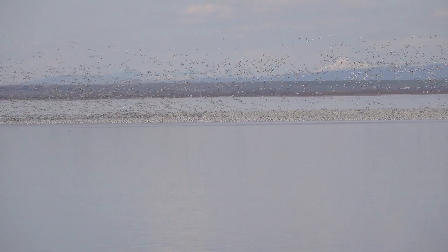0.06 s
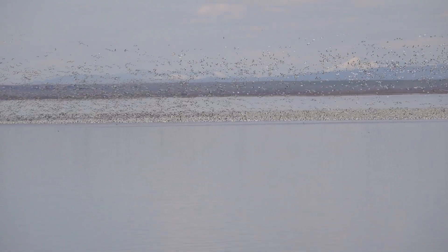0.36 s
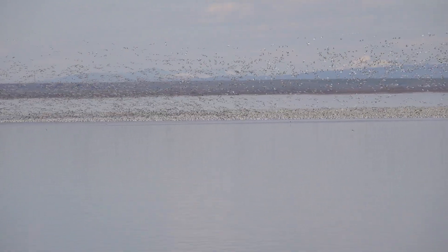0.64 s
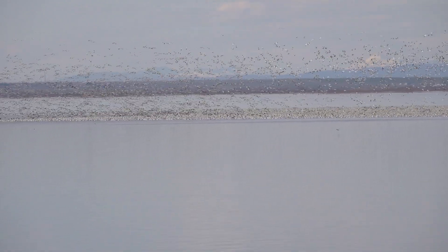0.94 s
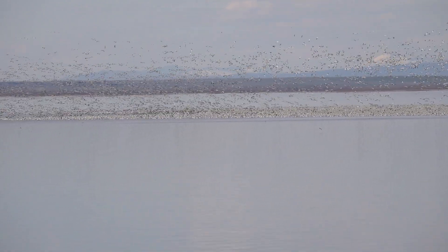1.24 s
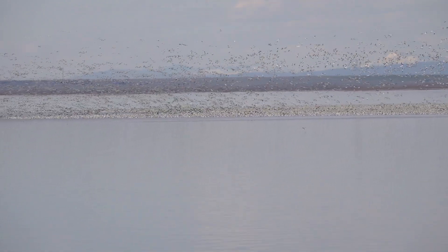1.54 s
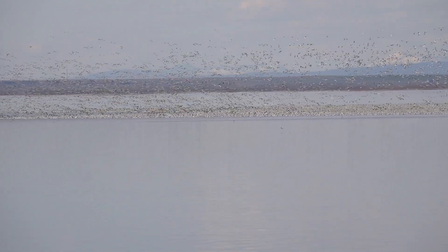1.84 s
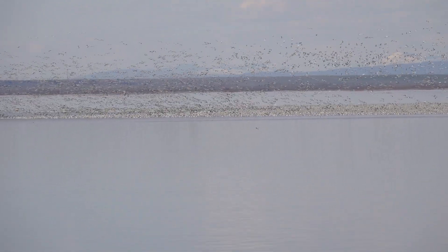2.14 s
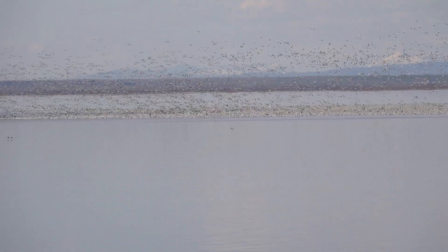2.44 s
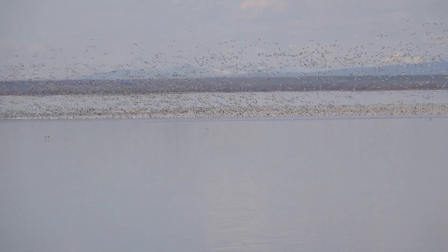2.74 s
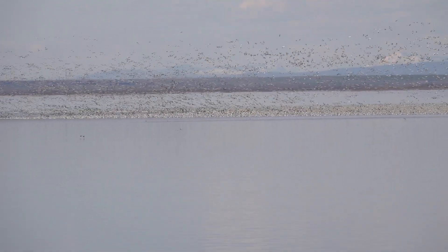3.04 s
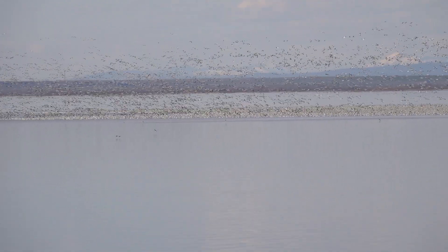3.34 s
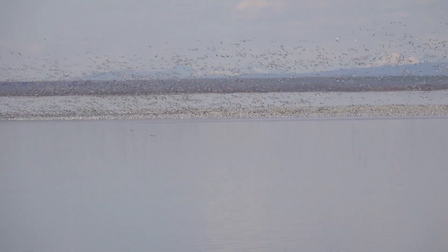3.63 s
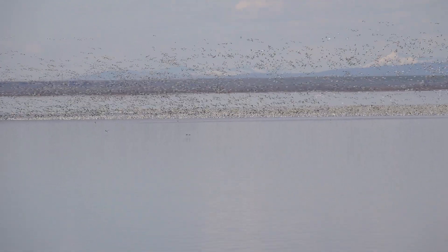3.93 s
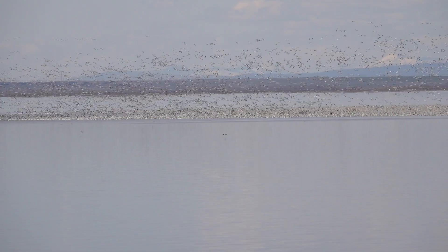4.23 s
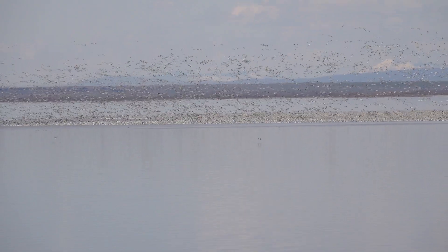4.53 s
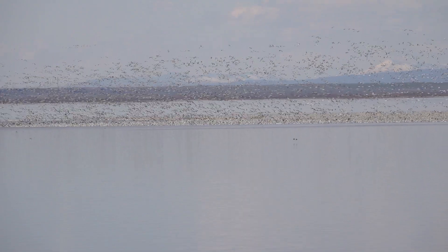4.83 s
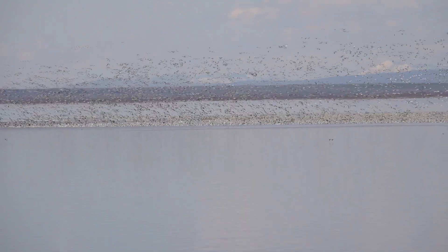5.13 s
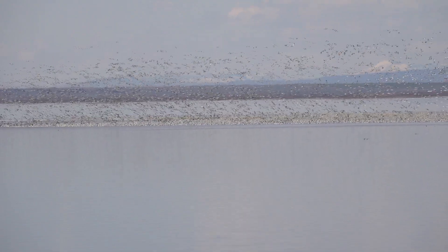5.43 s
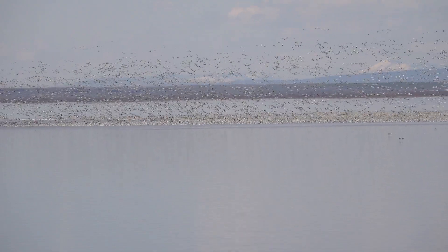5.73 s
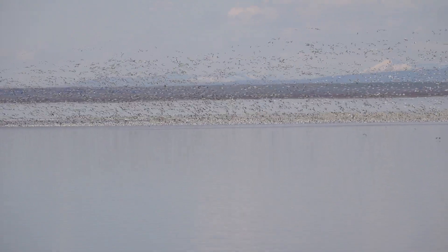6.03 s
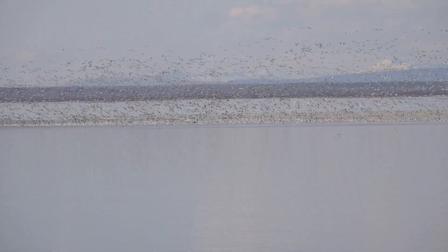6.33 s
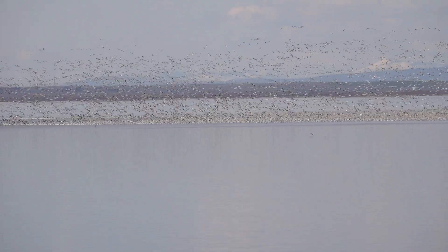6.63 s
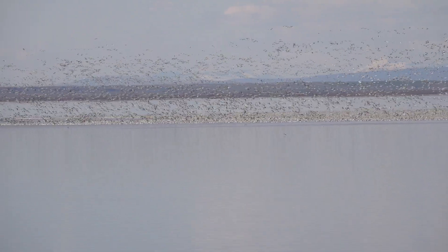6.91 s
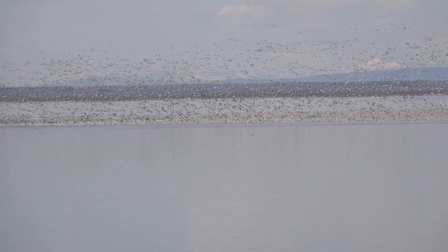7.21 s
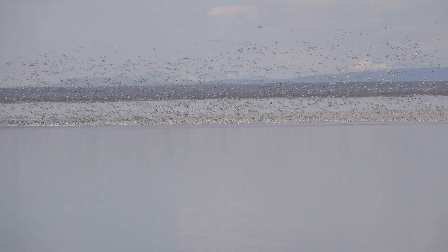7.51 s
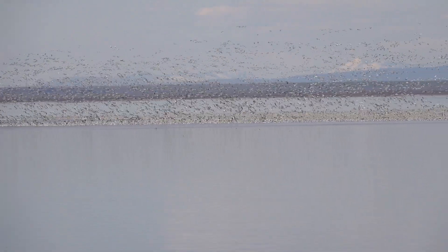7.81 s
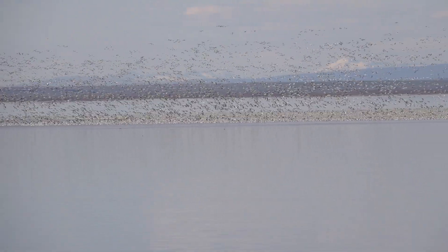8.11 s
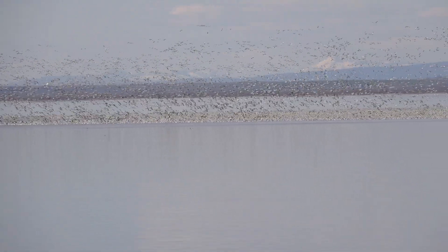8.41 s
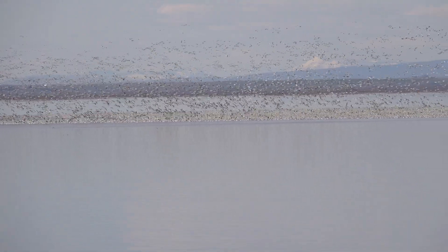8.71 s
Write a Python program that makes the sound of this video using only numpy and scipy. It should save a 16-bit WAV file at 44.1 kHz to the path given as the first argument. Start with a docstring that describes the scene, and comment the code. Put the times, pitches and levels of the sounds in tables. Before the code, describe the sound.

A huge flock of geese gabbles far off across still water, its yelps blurred together over a low hum of distant traffic. A few small ticks sound near the microphone and some faint single honks follow. Then a long vehicle approaches from the right, passes close with roaring tyres and a falling engine note, and leaves to the left, trailing a bright hiss.

```python
"""A huge flock of geese gabbles far off across still water, thousands of yelps blurred into one bed.
Low hums come and go, a few small ticks sound close by and some nearer geese honk. Then a long road
vehicle comes up from the right, passes close and leaves to the left: its engine note drops with the
Doppler shift, its tyres drone, roar and howl, and a bright hiss like road spray trails behind it."""
import sys
import numpy as np
from scipy import signal
from scipy.fft import rfft, irfft, next_fast_len
from scipy.io import wavfile
from scipy.ndimage import uniform_filter1d, map_coordinates

SR = 44100
rng = np.random.default_rng(int(sys.argv[2]) if len(sys.argv) > 2 else 0)


def store_wav(level_fs):
    """Save 16-bit WAV to argv[1]."""
    pcm = np.round(np.clip(np.atleast_2d(level_fs), -1, 1) * 32767)
    wavfile.write(sys.argv[1], SR, pcm.T.astype(np.int16))


N = 395136
TIME = np.arange(N) / SR
WINDOW = dict(nperseg=1024, noverlap=768)
HZ, FRAMES, _ = signal.stft(np.zeros(N), SR, **WINDOW)  # f/Hz and t/s grid of the moving filters
HZ = HZ[:, None] + 1

# Tone colour of the far flock and the beds under it: f/Hz, relative level/dB
FLOCK_EQ = [(240, -39), (400, -11), (500, -3.5), (640, -3.5), (700, -2.5), (775, -3.5), (850, 1.5),
            (915, 0.5), (1000, -10), (1100, -11.5), (1290, -5), (1830, -13.5), (2000, -26), (2200, -43.5),
            (4000, -110)]
TRAFFIC_EQ = [(20, -23), (45, -5), (80, -13.5), (105, -0.5), (125, 0.5), (155, -3), (200, -4), (280, -20.5),
              (400, -18.5), (800, -18.5), (1500, -35.5), (2500, -44.5), (6000, -68)]
AIR_RUMBLE_EQ = [(15, -22), (28, -17.5), (45, 3.5), (65, 2.5), (95, 2.5), (140, -17), (300, -45),
                 (900, -120)]
MIC_HISS_EQ = [(20, 0), (2000, -8.5), (3500, -2), (6000, -3.5), (10000, -6.5), (15500, -10)]
# Low hums: peak t/s, half length/s, f/Hz, glide/(Hz/s), level/dB
LOW_HUMS = [(0.399, 0.64, 104.6, 2.1, -52), (1.526, 0.14, 103.5, 1.3, -48), (3.012, 1.9, 101.9, -1.28, -52),
            (3.304, 3.6, 158.1, 0.56, -55.5), (3.606, 0.89, 500.6, 1.5, -64),
            (4.697, 1.54, 83.4, 1.8, -47.5), (7.62, 0.16, 151.7, -1.8, -35), (8.4, 0.24, 152.5, -4, -49),
            (8.751, .3, 87.5, -1.38, -41)]
# Small contacts: t/s, level/dB, ring f/Hz, 60 dB decay/s, low-pass f/Hz, knock f/Hz, left-right/dB
CLOSE_TICKS = [(0.24, -42, 1810, 0.024, 2400, 1762, -6), (1.0275, -32, 8300, 0.01, 13940, 1304, 6.5),
               (1.14, -33, 6450, 0.014, 7100, 1500, -4), (2.17, -55, 7000, 0.013, 12000, 2090, -5),
               (5.101, -57, 5400, .012, 9000, 2290, 1), (7.5738, -40.5, 8700, .01, 12700, 1500, 8)]
# Nearer geese: t/s, fundamental level/dB, f/Hz, glide each way/share of pitch
NEAR_HONKS = [(1.76, -75, 970, .08), (1.98, -63, 800, 0.022), (2.71, -63, 760, -.03),
              (3.229, -63, 794, -0.065), (4.18, -59, 790, -0.038)]
# Tone colour of the tyre layers before Doppler shift: f/Hz, relative level/dB
CASING_EQ = [(40, -24), (90, -0.5), (140, -6.5), (210, -1.5), (255, 0), (295, -7), (325, -6.5), (450, -36),
             (1500, -78), (4000, -120)]
TREAD_EQ = [(150, -37.5), (330, -8), (450, 0.5), (620, 0), (850, 0), (1100, -3.5), (1500, -11.5),
            (1900, -37), (3000, -37), (8000, -94)]
PUMPING_EQ = [(900, -24), (1500, -1.5), (1800, -1), (2050, -1.5), (2400, -5.5), (2750, -13.5), (3500, -26),
              (5000, -26), (12000, -84)]
WHEEL_HISS_EQ = [(1500, -29), (2600, 0), (3300, 0.5), (4500, -7), (6000, -15.5), (8000, -21.5),
                 (10000, -24.5), (12000, -36), (16000, -47)]
# Fader moves of the tyres' upper bands: t/s, groove howl level/dB, air pumping level/dB
TYRE_FADERS = [(4.4, -55, -79), (5.14, -50, -74), (5.61, -37, -67), (5.89, -37, -57), (6.13, -33, -51),
               (6.6, -26.5, -45), (6.86, -33.5, -37), (7.17, -32, -42.5), (7.4, -26, -37.5),
               (7.63, -35.5, -44), (8.1, -25, -38), (8.13, -30.5, -37.5), (8.74, -39.5, -46),
               (8.96, -42.5, -45.5)]
# Engine partials: multiple of the firing rate, relative level/dB
ENGINE_ORDERS = [(.74, -4), (1, 6.5), (1.41, -7.5), (2, 1.5), (2.33, -5.5), (2.67, -3.5), (2.82, -10),
                 (2.97, -15.5)]
# Fader moves of the hiss ahead of the wheels: t/s, dull level/dB, fine level/dB
HISS_FADERS = [(5.0, -87, -92), (5.56, -65, -85), (5.73, -67, -87), (5.98, -59.5, -71),
               (6.88, -57.5, -68.5), (7.01, -52, -61.5), (7.27, -52, -70), (7.38, -50, -63.5),
               (7.6, -50.5, -60.5)]
# Tone colour of the trailing spray: f/Hz, relative level/dB
SPRAY_EQ = [(1500, -7.5), (2800, 7.5), (4000, 2.5), (5500, -2.5), (7000, -5), (9000, -8.5), (12500, -9),
            (16000, -10)]
# Stereo image of landscape, road and spray: f/Hz, left-right likeness (1 is mono)
FIELD_LIKENESS = [(220, 0.99), (350, 0.86), (600, 0.96), (820, .99), (1200, 0.89), (1800, 0.93),
                  (2500, 0.25), (5000, 0.18), (10000, 0.51)]
ROAD_LIKENESS = [(250, 1), (600, .99), (1200, 0.97), (2400, 0.85), (4800, .75), (7000, 0.62), (10000, .4)]
SPRAY_LIKENESS = [(1500, .75), (4000, 0.63), (6000, 0.39), (8000, 0.57), (11000, 0.96), (15000, 0.94)]
# Shading of the far microphone by a sound fully to one side: f/Hz, near-minus-far level/dB
SHADE_FROM_RIGHT = [(150, 0.5), (300, 1.5), (550, 4.5), (850, 5), (1200, 4), (1700, 6.5), (2400, 8.5),
                    (3400, 10.5), (4800, 15.5), (7000, 24), (10000, 12.5)]
SHADE_FROM_LEFT = [(100, 0.5), (300, 3), (550, 4.5), (850, 7.5), (1200, 8.5), (1700, 12), (2400, 12),
                   (3400, 12), (4800, 12), (6700, 5.5), (9500, 1.5), (14000, 3.5)]
# Head start of the near microphone for such a sound: f/Hz, phase/rad
LEAD_FROM_RIGHT = [(1000, 0), (2400, 0.45), (4000, .88), (6000, .88), (9000, .22), (12000, 0)]
LEAD_FROM_LEFT = [(120, 0), (500, 0.2), (1200, 0.72), (2000, 1.5), (2800, 0.7), (3500, 3), (5000, 2.5),
                  (7000, 4.3), (9000, 6.5), (11000, 6.5), (15000, 8.5)]


def amp(db):
    return 10 ** (np.asarray(db) / 20)


def unit(x):
    return x / np.sqrt(np.mean(x ** 2) + 1e-20)


def along(points, hz):
    """Read a (f/Hz, value) curve on a log frequency axis."""
    f, v = np.transpose(points)
    return np.interp(np.log(hz + 1), np.log(f + 1), v)


def wobble(rate):
    """Smooth random modulation, rate knots a second."""
    return map_coordinates(rng.standard_normal(int(N * rate / SR) + 4), [TIME * rate])


def swell(t, s, half_s):
    """A bell-shaped envelope that reaches 1 at time s."""
    return np.exp(-((t - s) / half_s) ** 2)


def filtered(x, response):
    """A static EQ; response gives the gain at each frequency."""
    m = next_fast_len(N + SR // 4)
    return irfft(rfft(x, m) * response(np.fft.rfftfreq(m, 1 / SR)), m)[..., :N]


def swept(x, gain):
    """A moving EQ; gain lies on the HZ by FRAMES grid."""
    spectrum = signal.stft(x, **WINDOW)[2]
    return signal.istft(spectrum * gain, **WINDOW)[1][..., :N]


def spread(pair, eq, likeness, mono_hz=140):
    """Two unrelated signals become a coloured left and right of rms 1, with the bass centred."""
    def mid_side(hz):
        width = np.arccos(np.clip(along(likeness, hz), -1, 1)) / 2 * hz ** 2 / (hz ** 2 + mono_hz ** 2)
        return amp(along(eq, hz)) * [np.cos(width), np.sin(width)]
    mid, side = filtered(pair, mid_side)
    return unit(np.array([mid + side, mid - side]))


def noise(eq, likeness):
    """Coloured stereo noise of rms 1."""
    return spread(rng.standard_normal((2, N)), eq, likeness)


def honk(t, pitch_hz, length_s, glide, arch, second_db, third_db):
    """A goose's yelp of three harmonics: the pitch arches over while the note swells and dies."""
    progress = np.clip(t / length_s, 0, 1)
    bend = 2 * progress - 1
    hz = pitch_hz * (1 + glide * bend - arch * bend ** 2)
    phase = 2 * np.pi * np.cumsum(hz, axis=-1) * (t[1] - t[0])
    voice = np.sin(phase) + amp(second_db) * np.sin(2 * phase) + amp(third_db) * np.sin(3 * phase)
    return np.sin(np.pi * progress) * voice


def flock(count=2100, pitch_hz=830, length_s=.1, level_db=-47.5):
    """Single yelps stand out of the blur of thousands; the long way over the water takes their treble."""
    step = 5  # the yelps are built at SR / step
    t = np.arange(SR // (4 * step)) * step / SR
    start = rng.integers(0, N // step + len(t), count)[:, None]
    pitch, length, glide, loudness, side = rng.standard_normal((count, 5)).T[:, :, None]
    lengths_s = np.minimum(length_s * np.exp(.2396 * length), t[-1])
    calls = honk(t, pitch_hz * np.exp(.16 * pitch), lengths_s, .0601 * glide,
                 arch=.1171, second_db=3, third_db=-9)
    calls *= amp(2 * np.minimum(loudness, 1.7))  # capped: no bird of the flock is close
    place = (start + np.arange(len(t))).ravel()
    pair = [np.bincount(place, (calls * w).ravel(), N // step + 2 * len(t))[len(t):] for w in (1, side)]
    pair = signal.resample_poly(pair, step, 1, axis=1)[:, :N]
    yelps = spread(pair, FLOCK_EQ, FIELD_LIKENESS)
    blur = .7 * noise(FLOCK_EQ, FIELD_LIKENESS)
    return amp(level_db) * unit(yelps + blur)


def background(traffic_db=-50, air_db=-59, hiss_db=-78):
    """The bed: far traffic, hums, rumbling air that the vehicle stirs up, and microphone hiss."""
    traffic = amp(traffic_db + 1.7 * wobble(4.5)) * noise(TRAFFIC_EQ, FIELD_LIKENESS)
    wake = passing(db=-42, abreast_s=7.45, passing_s=.18, falloff=.5)
    rumble = np.hypot(amp(air_db), wake) * noise(AIR_RUMBLE_EQ, FIELD_LIKENESS)
    return traffic + hums() + rumble + amp(hiss_db) * noise(MIC_HISS_EQ, FIELD_LIKENESS)


def hums(throb_db=2, waver_rad=.4):
    """Low hums swell, waver and fade; the loudest swells as the vehicle passes."""
    out = np.zeros(N)
    for s, half_s, hz, glide, db in LOW_HUMS:
        phase = 2 * np.pi * np.cumsum(hz + glide * (TIME - s)) / SR + waver_rad * wobble(7.9)
        out += amp(db + throb_db * wobble(8)) * swell(TIME, s, half_s) * unit(np.sin(phase))
    return out


def ticks(ring_db=-7, crack_db=-3, crack_low_hz=4000, lag_s=.00005):
    """Tiny hard contacts near the microphone: a crack, a brief ring and a dull knock."""
    out, t = np.zeros((2, N + SR)), np.arange(SR // 20) / SR
    sides = np.array([[.5], [-.5]])
    high_pass = signal.butter(2, crack_low_hz, "high", fs=SR, output="sos")
    for s, db, ring_hz, t60, edge_hz, knock_hz, left_db in CLOSE_TICKS:
        heard = t + sides * np.sign(left_db) * lag_s  # the nearer side leads
        crack = amp(crack_db) * signal.sosfilt(high_pass, rng.standard_normal((2, len(t))))
        ring = amp(ring_db) * np.sin(2 * np.pi * ring_hz * heard)
        knock = np.sin(2 * np.pi * knock_hz * heard)
        decay = amp(db + sides * left_db - 60 * t / t60)
        low_pass = signal.butter(4, edge_hz, fs=SR, output="sos")
        out[:, round(s * SR):][:, :len(t)] += signal.sosfilt(low_pass, decay * (crack + ring + knock))
    return out[:, :N]


def near_geese(length_s=.113):
    """A few closer birds, heard mostly by their second harmonic."""
    out, t = np.zeros(N + SR), np.arange(SR // 4) / SR
    for s, db, hz, glide in NEAR_HONKS:
        call = honk(t, hz, length_s, glide, arch=.045, second_db=7.5, third_db=-39)
        out[round(s * SR):][:len(t)] += amp(db) * call
    return out[:N]


def direction(t, abreast_s, passing_s):
    """Where a passing thing is: -1 far right, 0 abreast, 1 far left."""
    return (t - abreast_s) / np.hypot(t - abreast_s, passing_s)


def doppler(t, mach=.078, abreast_s=7.7, passing_s=.5):
    """Pitch factor of the vehicle: high while it comes, low once it has gone by."""
    return 1 / (1 + mach * direction(t, abreast_s, passing_s))


def passing(db, abreast_s, passing_s, falloff):
    """Gain of a vehicle part by its distance; in passing_s it travels as far as the road is away."""
    return amp(db) / np.hypot(1, (TIME - abreast_s) / passing_s) ** falloff


def far_off(clear_s, db_per_s):
    """Fade-in: the ground swallows the sound while the vehicle is still far away."""
    return amp(-db_per_s * np.maximum(clear_s - TIME, 0))


def faders(rows, rise_db_per_s, fall_db_per_s):
    """A gain curve for each level column, fading in before the first row and out after the last."""
    s, *columns = np.transpose(rows)
    fade_db = rise_db_per_s * np.maximum(s[0] - TIME, 0) + fall_db_per_s * np.maximum(TIME - s[-1], 0)
    return [amp(np.interp(TIME, s, db) - fade_db) for db in columns]


def rush(shape, patchy_db, likeness=ROAD_LIKENESS):
    """Road noise of rms 1 with a moving spectrum; the uneven surface gives it patches."""
    patches = uniform_filter1d(rng.standard_normal(shape.shape), 5, axis=0)
    patches = unit(uniform_filter1d(patches, 24, axis=1))
    gain = shape * amp(patchy_db * patches) / np.sqrt(np.mean(shape ** 2, axis=0))
    white = noise([(20, 0), (20000, 0)], likeness)
    return unit(swept(white, gain))


def tyres(pumping_trim_db=1):
    """Casings drone, tread blocks roar, air is pumped out of the tread and the grooves howl."""
    howl_gain, pumping_gain = faders(TYRE_FADERS, rise_db_per_s=11, fall_db_per_s=30)
    body = casing_drone() + tread_roar()
    pumping = rush(amp(along(PUMPING_EQ, HZ / doppler(FRAMES))), patchy_db=2.2)
    return body + pumping_gain * amp(pumping_trim_db) * pumping + groove_howl(howl_gain)


def casing_drone():
    """The low drone of the tyre casings, heard from far down the road."""
    gain = passing(db=-29, abreast_s=7.44, passing_s=1.37, falloff=2.74)
    shape = amp(along(CASING_EQ, HZ / doppler(FRAMES, mach=.18)))
    return gain * far_off(clear_s=3.9, db_per_s=.5) * rush(shape, patchy_db=.76)


def resonance(centre_hz, width_hz):
    """A steep-sided band-pass, 1 at its centre."""
    return 1 / (1 + ((HZ ** 2 - centre_hz ** 2) / (HZ * width_hz)) ** 2)


def groove_howl(gain, pipe_hz=1185, whine_db=-33, whine_s=8.06, whine_hz=1040, sink_hz_per_s=120):
    """The tread grooves howl like short pipes; behind the wheels this narrows to a sinking whine."""
    centre_hz = pipe_hz * doppler(FRAMES, mach=.045, abreast_s=6.96, passing_s=.13)
    broad = resonance(centre_hz, width_hz=590) / np.hypot(1, (HZ / 2100) ** 6)
    narrow = resonance(whine_hz - sink_hz_per_s * (FRAMES - whine_s), width_hz=160)
    crossfade = swell(TIME, whine_s, half_s=.39)
    howl = gain * (1 - .65 * crossfade) * rush(broad, patchy_db=1.5)
    whine = amp(whine_db) * crossfade * rush(narrow, patchy_db=-1.4)
    return howl + whine


def engine(firing_hz=105, waver=.00297, throb_db=1.73, jitter_rad=.35, level_db=-29.5, dip_db=13):
    """Exhaust and drive-line orders; higher ones carry farther, and the level dips just past its peak."""
    phase = 2 * np.pi * np.cumsum(firing_hz * doppler(TIME) * (1 + waver * wobble(4))) / SR
    note = np.zeros(N)
    for order, db in ENGINE_ORDERS:
        falloff = 1.444 / order ** .24
        gain = passing(db + throb_db * wobble(5.8), abreast_s=7.616, passing_s=.31, falloff=falloff)
        note += gain * np.sin(order * phase + jitter_rad * wobble(9))
    dip = swell(TIME, s=7.8, half_s=.22)
    return amp(level_db - dip_db * dip) * far_off(clear_s=5.7, db_per_s=1) * note


def tread_roar(early_db=4, linger_db_per_s=5, gone_s=8.02):
    """The tread blocks' roar swells once on the approach, peaks with each set of wheels and lingers."""
    front = passing(db=-26.5, abreast_s=7.224, passing_s=.21, falloff=.83)
    rear = amp(-31) * swell(TIME, s=7.88, half_s=.16)
    lift_db = early_db * swell(TIME, s=5.71, half_s=.25) + linger_db_per_s * np.maximum(TIME - gone_s, 0)
    gain = np.hypot(front, rear) * amp(lift_db) * far_off(clear_s=6.18, db_per_s=5.5)
    return gain * rush(amp(along(TREAD_EQ, HZ / doppler(FRAMES))), patchy_db=-.3)


def wheel_hiss(crossover_hz=6000, dull_trim_db=1):
    """Hiss runs ahead of the wheels; its dull band arrives first, its fine band later."""
    dull_gain, fine_gain = faders(HISS_FADERS, rise_db_per_s=20, fall_db_per_s=21)
    shape = amp(along(WHEEL_HISS_EQ, HZ / doppler(FRAMES)))
    dull = rush(shape / np.hypot(1, (HZ / crossover_hz) ** 7), patchy_db=2.4)
    fine = rush(shape / np.hypot(1, (crossover_hz / HZ) ** 7), patchy_db=1)
    return dull_gain * amp(dull_trim_db) * dull + fine_gain * fine


def spray(level_db=-41.5, tail_s=7.7, burst_s=.04, rise_db_per_s=22, fall_db_per_s=3,
          ends_s=8.58, release_s=.11, flutter_db=1.1):
    """A fluttering hiss bursts out as the vehicle's tail goes by, bright at first; it dulls and drops."""
    age = TIME - tail_s
    shielded = (1 - np.tanh(age / burst_s)) / 2
    ended = (1 + np.tanh((TIME - ends_s) / release_s)) / 2
    accent = lambda t: swell(t, s=7.89, half_s=.14)
    ramp_db = rise_db_per_s * np.minimum(age, 0) - fall_db_per_s * np.maximum(age, 0)
    db = level_db + ramp_db - 16 * shielded + 2 * accent(TIME) - 6 * ended
    cutoff_hz = 14000 * np.exp(-.32 * np.maximum(FRAMES - tail_s, 0))
    sparkle = np.hypot(1, accent(FRAMES) * (HZ / 13000) ** 4)
    shape = amp(along(SPRAY_EQ, HZ)) / np.hypot(1, (HZ / cutoff_hz) ** 7) * sparkle
    return amp(db + flutter_db * wobble(45)) * rush(shape, patchy_db=1, likeness=SPRAY_LIKENESS)


def vehicle(long_wave_hz=150):
    """The whole pass-by pans from right to left; the far microphone is shaded and hears it later."""
    width = HZ ** 2 / (HZ ** 2 + long_wave_hz ** 2)  # long waves bend round to both sides
    bearing = direction(FRAMES, abreast_s=7.306, passing_s=.39) * width
    left_db = bearing * np.where(bearing < 0, along(SHADE_FROM_RIGHT, HZ), along(SHADE_FROM_LEFT, HZ))
    lead_rad = bearing * np.where(bearing < 0, along(LEAD_FROM_RIGHT, HZ), along(LEAD_FROM_LEFT, HZ))
    left = amp(left_db / 2) * np.exp(.5j * lead_rad)
    pan = np.array([left, 1 / left])
    return swept(tyres() + wheel_hiss() + spray() + engine(), pan / np.abs(pan).mean(axis=0))


def scene():
    """Geese over the water, close ticks and the pass-by, over a quiet bed."""
    return flock() + near_geese() + ticks() + vehicle() + background()


def record(dry, mono_hz=190, top_hz=15800):
    """The close-set microphones hear the bass alike; everything above top_hz is cut."""
    mid = dry.mean(axis=0)
    side = filtered(dry[0] - mid, lambda hz: hz ** 2 / np.hypot(hz ** 2, mono_hz ** 2))
    return filtered(np.array([mid + side, mid - side]), lambda hz: hz < top_hz)


dry = scene()
out = record(dry)
store_wav(out)
```